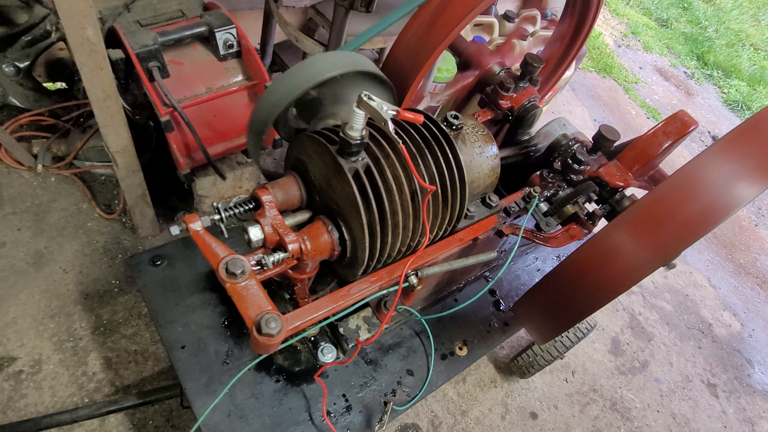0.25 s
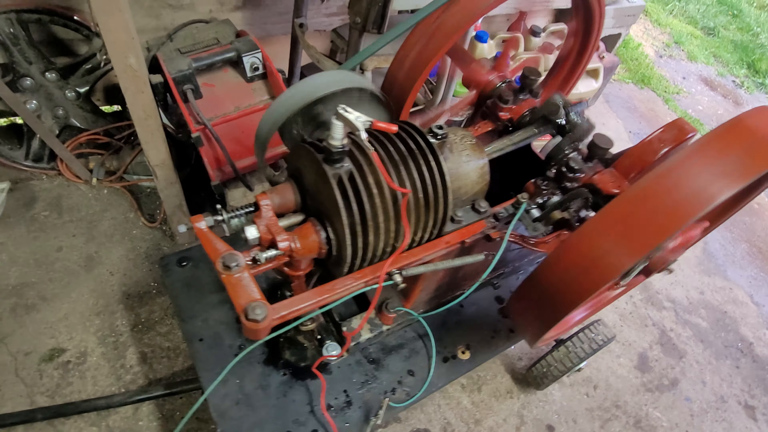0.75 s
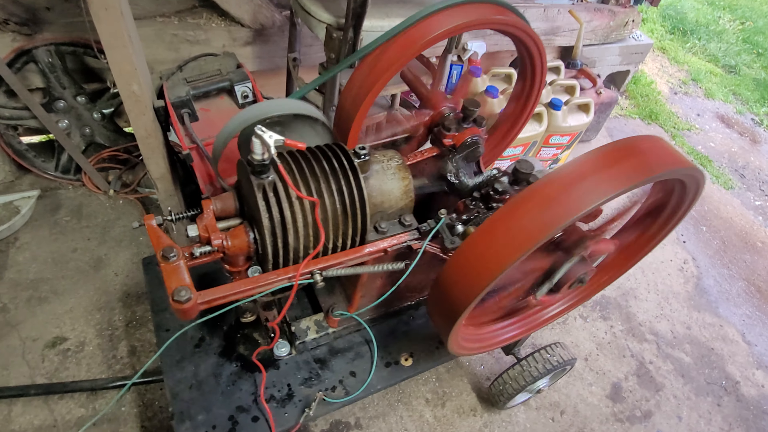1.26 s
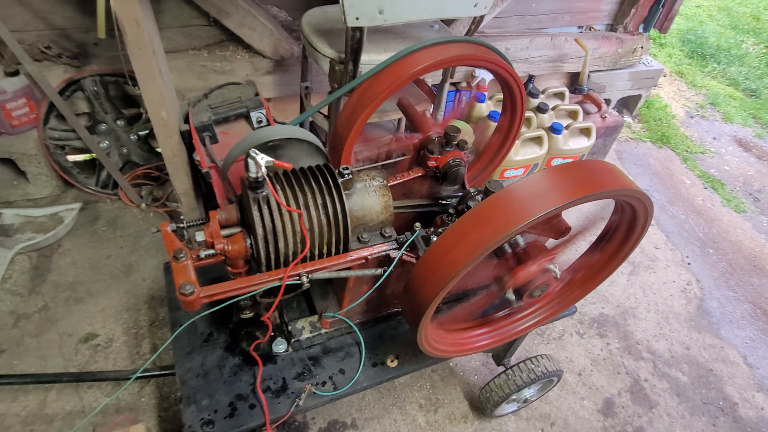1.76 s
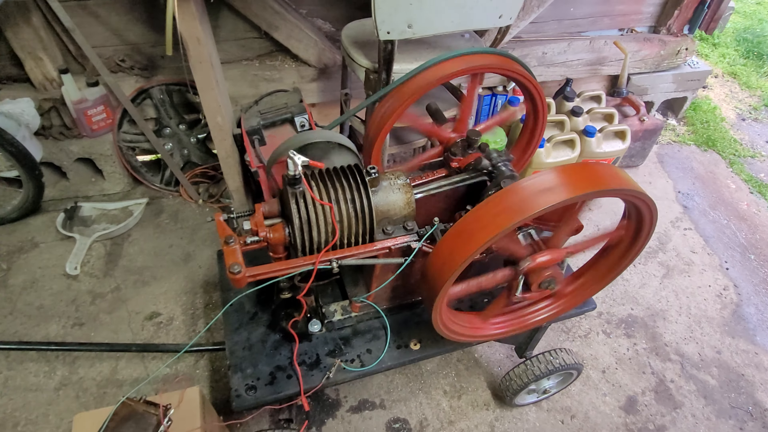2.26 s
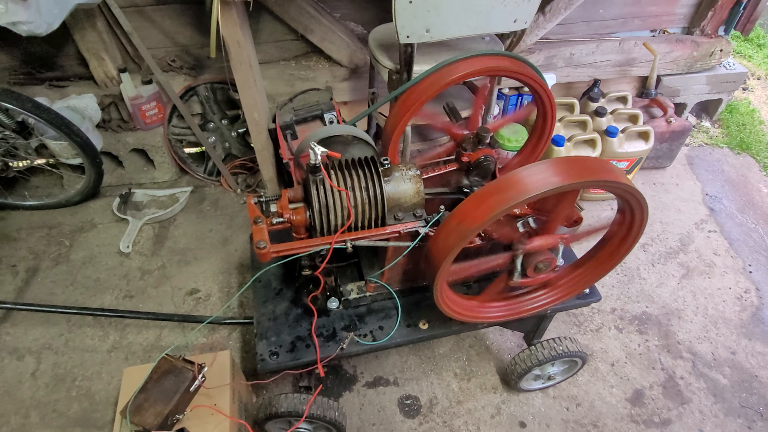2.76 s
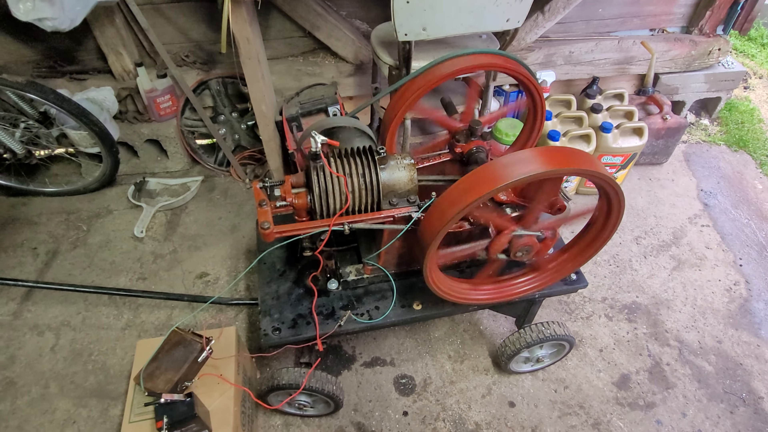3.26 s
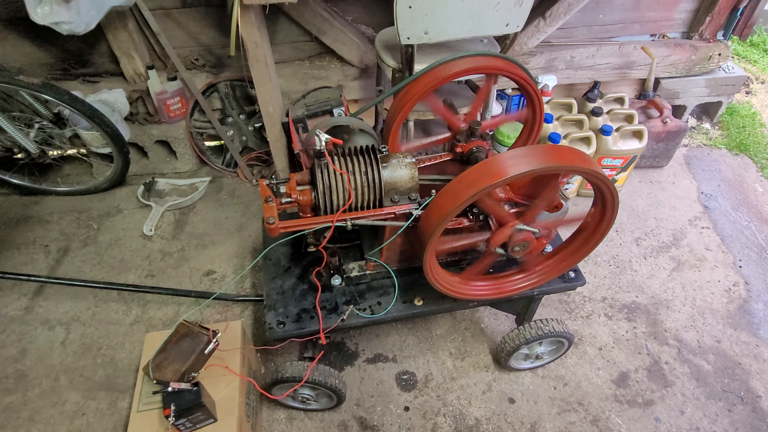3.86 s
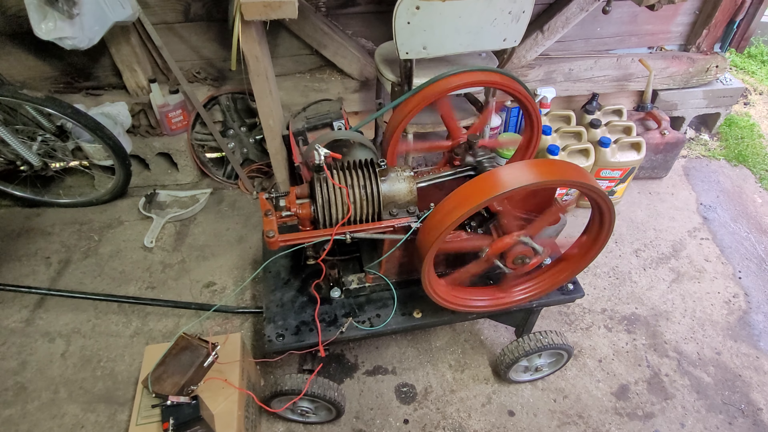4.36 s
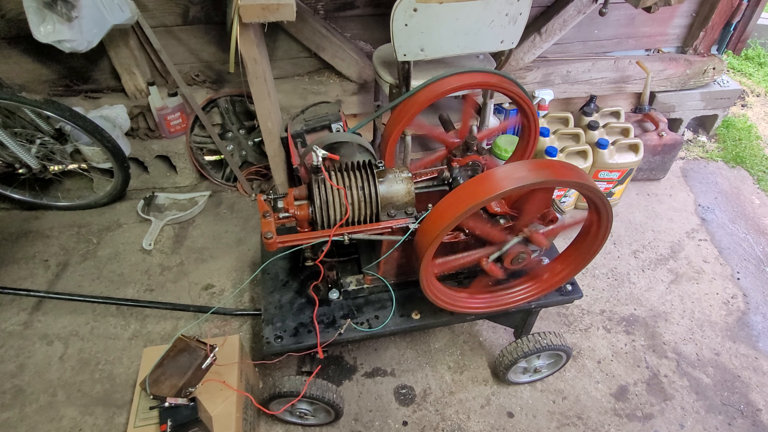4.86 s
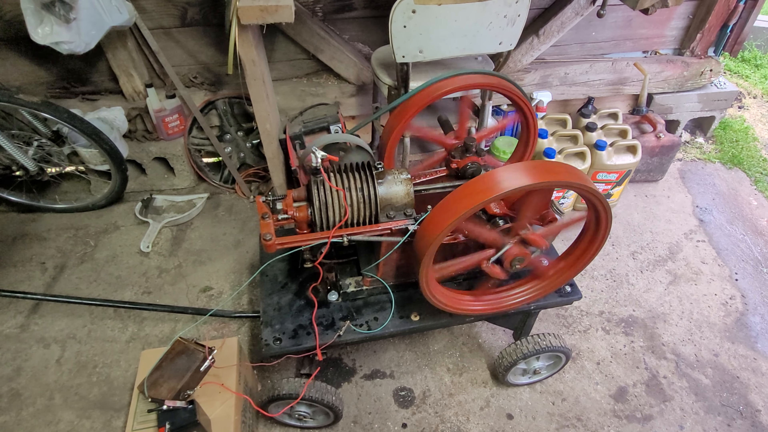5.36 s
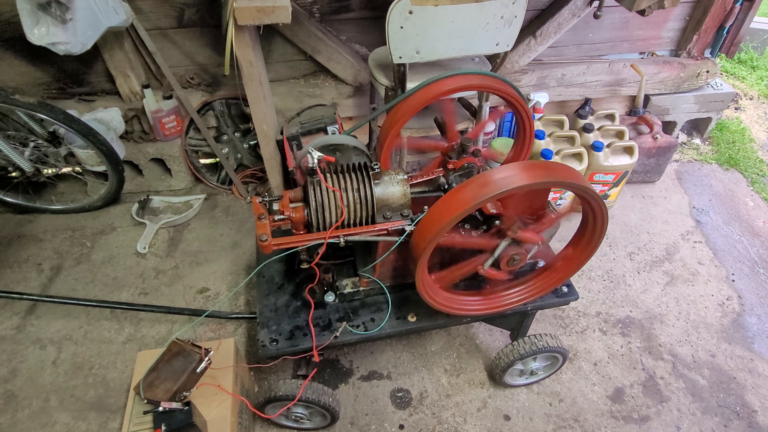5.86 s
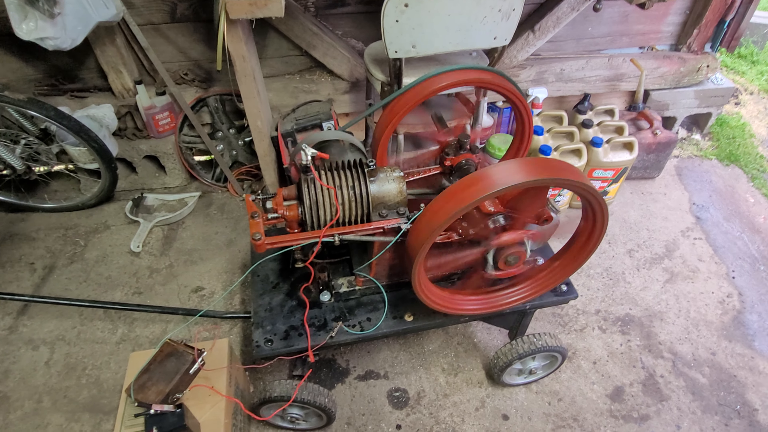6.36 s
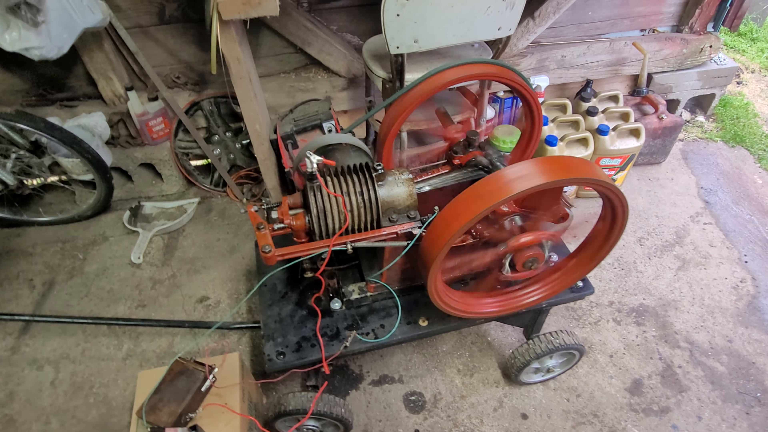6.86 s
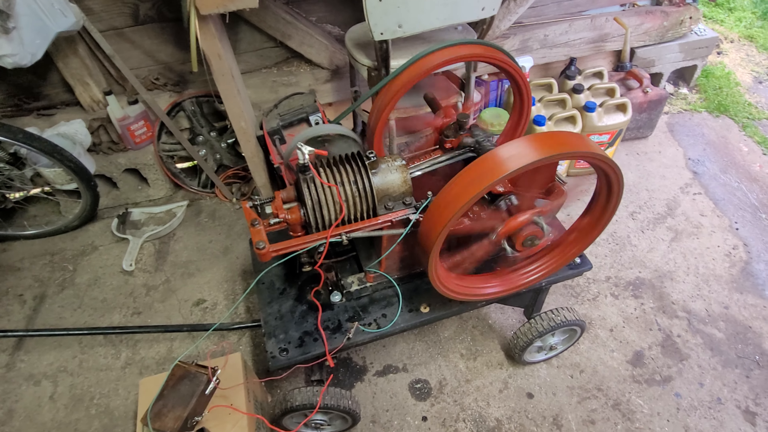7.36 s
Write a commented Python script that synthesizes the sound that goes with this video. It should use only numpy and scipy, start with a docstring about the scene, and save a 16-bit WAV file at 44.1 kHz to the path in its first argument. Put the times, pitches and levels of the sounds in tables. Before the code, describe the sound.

Old flywheel engine coasting with metallic clatter and a hollow drone, gulping air and cracking out a hard exhaust bang about every one and a half seconds.

```python
"""An open shed, where a small air-cooled hit-and-miss engine runs on its cart.
Every third or fourth turn it gulps air, sparks and fires: noise pulses played through the ring of each part.
In between it coasts: the valve gear clanks once a turn, the slack rod and gears knock, the piston pumps
air through the open valve, and the frame drones hollowly as noise and a swaying tone.
The microphone starts by the valves, where their treble is strong, and backs away."""
import sys
import numpy as np
from scipy import signal
from scipy.fft import rfft, irfft
from scipy.io import wavfile
from scipy.ndimage import uniform_filter1d

SR = 44100
rng = np.random.default_rng(int(sys.argv[2]) if len(sys.argv) > 2 else 0)


def put_to_file(sound):
    """Save the sound as 16-bit audio at rate SR, in the file named by the first command-line argument."""
    columns = np.atleast_2d(sound).T  # one column per channel
    safe = np.clip(columns, -1, 1)
    whole_steps = np.round(safe * 32767)
    wavfile.write(sys.argv[1], SR, whole_steps.astype(np.int16))


N = 335160
TIME = np.arange(N) / SR   # seconds
HZ = np.maximum(np.arange(N // 2 + 1) * SR / N, 1)

# All levels in these tables are relative: the functions add their own trims.
# Firings: the bang, the gulp of air and frame boom before it, and the igniter's snap
# (bang t/s, bang level/dB, gulp level/dB, gulp length t/s, boom level/dB, spark level/dB, spark lead t/s)
FIRINGS = [(0.102, -19.5, -22, 0.067, -25, -29.5, 0.044), (1.25, -14.5, -30, 0.068, -30, -21.5, 0.028),
           (2.763, -12, -16, .064, -15.5, -25, 0.022), (4.294, -10.5, -17.5, .063, -16.5, -20, .023),
           (5.846, -12.5, -16.5, 0.064, -11.5, -25, 0.023), (6.975, -11.5, -23, .11, -19, -20, 0.02)]
# Valve gear clank, once a turn, answered by a hollow note of the frame
# (t/s, level/dB, brightness level/dB, note level/dB, note delay t/s)
CLANKS = [(0.225, -25.5, -17, -30.5, 0.079), (0.5964, -31, -11, -39, 0.084),
          (0.9976, -30.5, -11, -44, 0.08), (1.3687, -19.5, -11.5, -29.5, 0.053),
          (1.72, -25.5, -6, -24.5, 0.088), (2.0976, -23.5, -10, -39, .04), (2.508, -20.5, -5, -20, 0.074),
          (2.8854, -20.5, -10, -23, 0.066), (3.2434, -23, -12, -18, 0.08), (3.6222, -25, -8.5, -30, 0.081),
          (4.0347, -20, -6.5, -16.5, 0.063), (4.4162, -16.5, -12, -18, 0.1),
          (4.7776, -22.5, -8.5, -15, .081), (5.1602, -22, -9.5, -24, .066), (5.5828, -17, -9, -15.5, .11),
          (5.966, -20, -10.5, -16.5, .06), (6.3348, -20.5, -13, -22, 0.07),
          (6.7281, -25.5, -7.5, -26, 0.071), (7.091, -18, -8, -23.5, 0.049), (7.4435, -23, -6, -18, 0.073)]
# Thin ticks of the valve rocker (t/s, level/dB)
TICKS = [(0.235, -34.5), (0.265, -27.5), (0.441, -32), (0.602, -31), (0.633, -34), (0.831, -38),
         (0.9985, -34.5), (1.032, -33.5), (1.408, -25.5)]
# The slack rod rattles about halfway through every coasting turn
# (t/s, level/dB, length t/s, frame boom level/dB)
RATTLES = [(0.432, -31.5, 0.061, -41), (0.819, -32, 0.064, -37.5), (1.561, -25, 0.064, -26),
           (1.9354, -23, 0.055, -27.5), (2.329, -26, 0.074, -24.5), (3.077, -25, 0.063, -25),
           (3.453, -24.5, 0.063, -29), (3.855, -27, 0.076, -25.5), (4.6125, -23.5, .058, -20.5),
           (4.9923, -22, 0.06, -26), (5.3948, -23, 0.07, -21.5), (6.1707, -25, .064, -20),
           (6.5545, -24.5, 0.068, -28), (7.278, -23.5, 0.061, -22)]
# The three knocks of a rattle
# (share of its length, level/dB, brightness level/dB, extra level at full jolt/dB)
RATTLE_KNOCKS = [(0, -11, -1.5, 22.5), (0.364, 0, -18, 0.5), (1, -9, 3, 3)]
# The governor latch knocks ahead of a firing (t/s, level/dB, brightness level/dB)
LATCH = [(2.6193, -26.5, -2), (3.9982, -27, -8), (4.147, -25, -3), (5.5411, -29, 1.5)]
# One turn, counted from the clank
# (share of the turn, pumped air level/dB, cart thud level/dB, gear churn level/dB)
TURN = [(0, -34.5, -47, -31.5), (.09, -37, -34.5, -31.5), (.14, -41.5, -40.5, -31.5), (.2, -52, -55, -39),
        (.3, -37, -48, -44.5), (.37, -29.5, -77, -33), (.44, -31, -82, -43.5), (.52, -45.5, -49, -41.5),
        (.6, -45.5, -42.5, -29), (.67, -52, -52, -31.5), (.77, -44.5, -41.5, -28), (.87, -31, -74, -34),
        (.96, -34.5, -63, -35.5), (1, -52, -32.5, -39.5)]
# Backing away from the valves brings the crank end and frame into play
# (t/s, running gear level/dB, drone level/dB, drone f/Hz)
BACKING = [(0, -6.5, -46.5, 282), (1.05, -10, -46, 291.5), (1.5, -2.5, -34.5, 296), (2.4, -3.5, -32.5, 305),
           (3.6, -5, -32, 313), (4.4, -4, -30, 318.1), (5.7, -2.5, -30.5, 314.3), (6.7, -4.5, -32.5, 314.3),
           (7.6, -1.5, -33, 305.2)]
# Band of extra treble close to the valves (t/s, left level/dB, right level/dB, centre f/Hz)
CLOSENESS = [(0, 26, 10, 12460), (.35, 20, 0, 13100), (.75, 19.5, 3, 12650), (1.2, 14, 1, 11900),
             (1.55, 11.5, 4, 11300), (1.9, 3.5, 1, 10300), (2.4, -0.5, 3.5, 9600), (7.6, -1, 2.5, 9300)]
# Frame resonances (f/Hz, spread f/Hz, level/dB)
FRAME = [(252.5, 9.2, -13), (285, 23.3, -6.5), (334.6, 30, -6.5)]
# Ringing of the ironwork (f/Hz, level/dB, time to fall 60 dB t/s)
IRON = [(1482, -6.5, 0.23), (1703, -1, 0.23), (2020, -9.5, 0.25), (2089, 6, 0.059), (2280, 6, 0.13),
        (2485, 3.5, 0.18), (3045, 6.5, 0.061), (3280, -19, 0.48), (4200, -32, .2), (4440, -14, 0.23),
        (4800, -14, 0.12), (5160, -43, 0.13), (5250, 7, 0.11), (5470, -19, 0.16)]
# Hollow notes of every gulp
# (f/Hz, level relative to the gulp/dB, extra level close to the valves/dB, delay t/s, width t/s)
GULP_NOTES = [(190, -18, 14.5, 0.049, 0.0145), (471, -9, 8.5, 0.043, 0.011)]

# Tone colour of each part (f/Hz, relative level/dB)
EXHAUST = [(60, -8), (160, -13), (300, -4.5), (600, -2), (800, -8.5), (1250, -21), (2050, 3.5),
           (2700, -6.5), (4700, 1), (6300, -7.5), (8200, -12.5), (10500, -10), (16000, -20)]
INTAKE = [(60, -19), (170, -40), (300, 14.5), (420, 7.5), (600, 2.5), (1000, -4.5), (2100, 0.5), (2800, 1),
          (5000, 3.5), (8000, -6.5), (10500, -2.5), (16000, -8)]
CLATTER = [(150, -26), (500, -11), (1000, -10.5), (1550, -5), (2350, 1), (3000, -10), (4300, -4),
           (5300, -5.5), (6400, -19.5), (8300, -24), (10500, -18), (16000, -26.5)]
AIR = [(500, 0.5), (1500, -10.5), (3500, -13), (5200, -0.5), (8200, -4.5), (10000, 3.5), (12200, 0.5),
       (14000, -2.5), (16000, -3.5)]
CHURN = [(90, -29), (140, -35.5), (190, -10), (260, 7.5), (450, -1.5), (640, -0.5), (900, -8), (1300, -8),
         (2200, -9), (5000, -15.5), (8000, -22), (16000, -93)]
THUD = [(20, -26), (35, -9.5), (50, 0.5), (70, 4), (100, -7.5), (130, -10.5), (200, -17.5), (600, -64)]
SPARK = [(500, -41), (2500, 2), (4500, 2), (8000, -4.5), (11000, 5), (13000, -1), (16000, -16)]
# How alike left and right are (f/Hz, likeness from 0 to 1)
LIKENESS = [(60, 0.9), (130, 0.9), (290, 1), (640, 0.92), (1400, 0.12), (3100, 0.063)]
# Left minus right (f/Hz, level/dB)
LEAN = [(60, -2), (92, 5), (140, -4), (210, 1.5), (330, -0.5), (500, 2), (770, 1), (1170, 1.5), (1790, -1),
        (2740, 0), (4190, 11), (6410, 7.5), (9810, 5.5), (15000, -2)]

SIDES = np.array([[1], [-1]])   # left, right
CUTOFF_HZ, TREBLE_WIDTH_HZ, RIGHT_LAG_S = 15800, 2600, 0.0001
INTAKE_LEAD_TURNS = 0.27   # the intake valve is sucked open this long before the bang
JOLT_RISE_S, JOLT_FADE_S = 0.24, 0.29
JOLT_AIR_DB, JOLT_THUD_DB, JOLT_CHURN_DB = -1.5, 3.5, 3.5
DRONE_SWING_DB, DRONE_LOUDEST_TURN = 3.5, 0.12   # the drone swells once a turn
DRONE_SWING_HZ, DRONE_HIGHEST_TURN = 7.2, 0.2734   # and its pitch sways
CLANK_NOTE_HZ, CLANK_NOTE_S = 334.3, 0.011
# The clank's note also crowns a rattle's boom, most of all near a firing
BOOM_NOTE_DB, BOOM_NOTE_JOLT_DB, BOOM_NOTE_DELAY_S = -9.5, 20, 0.056
RATTLE_NOTE_HZ, RATTLE_NOTE_DELAY_S, RATTLE_NOTE_S = 446.4, 0.09, 0.015
RATTLE_NOTE_DB, RATTLE_NOTE_CLOSE_DB = -33, 7   # louder close to the valves


def from_db(db):
    """Turn decibels into a gain."""
    return 10 ** (np.asarray(db) / 20)


def rms_one(x):
    """Scale to an average strength (rms) of 1."""
    return x / np.sqrt(np.mean(x ** 2) + 1e-20)


def follow(rows, at):
    """Read each column of a curve table at the given places."""
    place, *columns = np.transpose(rows)
    return [np.interp(at, place, column) for column in columns]


def at_hz(points):
    """Read a short spectrum at every frequency."""
    hz, value = np.transpose(points)
    return np.interp(np.log(HZ), np.log(hz), value)


def stereo_noise(gain):
    """Coloured noise, alike in both ears in the bass and different in the treble; rms 1."""
    mid, side = rfft(rng.standard_normal((2, N)))
    alike = np.clip(at_hz(LIKENESS), -1, 1)
    both = np.sqrt(1 + alike) * mid + np.sqrt(1 - alike) * side * SIDES
    lean = from_db(SIDES * at_hz(LEAN) / 2)
    return rms_one(irfft(both * gain * lean, N))


def noise(spectrum):
    """Stereo noise with a spectrum in dB."""
    return stereo_noise(from_db(at_hz(spectrum)))


def steady(x, span_s):
    """Even out swells slower than the span, keeping the quick beats."""
    power = uniform_filter1d(np.mean(x ** 2, axis=0), max(int(span_s * SR), 8))
    return x / np.sqrt(np.maximum(power, 1e-9))


def burst(start, rise_s, hold_s, t60):
    """A loudness curve that opens, holds and dies away, falling 60 dB in t60 seconds."""
    out = np.zeros(N)
    live = slice(max(int(start * SR), 0), int((start + hold_s + 2 * t60) * SR))
    age = np.maximum(TIME[live] - start, 0)
    opening = 1 - np.exp(-age / rise_s)
    out[live] = opening * from_db(-60 * np.maximum(age - hold_s, 0) / t60)
    return out


def response(spectrum, early_t60, shed_db, shed_t60, iron_db):
    """What one click on a part gives: a dense early ring, the iron's notes and the shed's tail; energy 1."""
    t = TIME[:SR // 2]
    hz_short = np.fft.rfftfreq(len(t), 1 / SR)
    fade = from_db(-60 * t / early_t60) + from_db(shed_db - 60 * t / shed_t60)
    dense = rfft(noise(spectrum)[:, :len(t)] * fade)
    # keep the fine random ripple, but make the broad colour follow the spectrum
    colour = from_db(np.interp(hz_short, HZ, at_hz(spectrum))) ** 2
    wanted = uniform_filter1d(colour, size=140)
    present = uniform_filter1d(np.mean(abs(dense) ** 2, axis=0), size=140)
    dense = irfft(dense * np.sqrt(abs(wanted / present)), len(t)) * (t < t[-1] / 2)
    modes = 0
    for hz, db, t60 in IRON:
        lean = from_db(np.interp(hz, HZ, at_hz(LEAN)) * SIDES / 2)
        wave = np.sin(2 * np.pi * (hz * t + rng.random((2, 1))))
        modes = modes + lean * from_db(db - 60 * t / t60) * wave
    return rms_one(rms_one(dense) + from_db(iron_db) * rms_one(modes)) / np.sqrt(len(t))


def sound(force, ring):
    """Play a force through the ring of a part (convolution)."""
    return signal.fftconvolve(force[None], ring, axes=1)[:, :N]


def chatter(per_s, spread_db=3.5):
    """Tiny contacts or puffs of uneven size at random moments; rms 1."""
    sizes = from_db(spread_db * np.clip(rng.standard_normal(N), -2, 2)) * rng.choice([-1, 1], N)
    return rms_one((rng.random(N) < per_s / SR) * sizes)


def turn_starts():
    """The moments at which turns begin: one at each clank, and one more at either end."""
    beats = np.array(CLANKS)[:, 0]
    return np.concatenate([[2 * beats[0] - beats[1]], beats, [2 * beats[-1] - beats[-2]]])


def crank(at):
    """Turns of the crank made by the given times."""
    beats = turn_starts()
    return np.interp(at, beats, np.arange(len(beats)))


def intake_time(bang_s):
    """When the intake valve opens for a bang, counted back in crank turns."""
    beats = turn_starts()
    return np.interp(crank(bang_s) - INTAKE_LEAD_TURNS, np.arange(len(beats)), beats)


def jolt(at):
    """How hard the gear is shaken: 1 at a firing, building up before it and fading after."""
    shakes = [np.exp(-np.maximum((s - at) / JOLT_RISE_S, (at - s) / JOLT_FADE_S)) for s, *_ in FIRINGS]
    return np.max(shakes, axis=0)


def nearness(s):
    """1 with the microphone by the valves, about 0 once it has backed away."""
    left_db, _, _ = follow(CLOSENESS, s)
    return left_db / CLOSENESS[0][1]


def coasting():
    """The crank angle times the piston's hiss, the cart's thuds and the gears' churn; firings shift their levels."""
    gear_db, _, _ = follow(BACKING, TIME)
    effort_db = gear_db + np.outer([JOLT_AIR_DB, JOLT_THUD_DB, JOLT_CHURN_DB], jolt(TIME))
    air, thud, churn = from_db(np.array(follow(TURN, crank(TIME) % 1)) + effort_db)
    hiss = air * noise(AIR)
    cart = thud * steady(noise(THUD), span_s=0.037)
    gear_ring = response(CHURN, early_t60=0.084, shed_db=-26, shed_t60=0.56, iron_db=-41.0)
    gears = sound(churn * chatter(900), gear_ring)
    return hiss + cart + gears


def frame(tone_db=-1.5, level_db=-3.5, boom_delay_s=0.025):
    """The frame drones among three close resonances, swaying with the crank; rattles and gulps make it boom."""
    gain = sum(from_db(db) / (1 + ((HZ - hz) / (0.6 * spread)) ** 2) for hz, spread, db in FRAME)
    _, drone_db, drone_hz = follow(BACKING, TIME)
    turns = crank(TIME)
    pitch = drone_hz + DRONE_SWING_HZ * np.cos(2 * np.pi * (turns - DRONE_HIGHEST_TURN))
    sway = from_db(drone_db + DRONE_SWING_DB * np.cos(2 * np.pi * (turns - DRONE_LOUDEST_TURN)))
    booms = np.zeros(N)
    for s, *_, db in RATTLES:
        booms += from_db(db) * burst(s + boom_delay_s, rise_s=0.004, hold_s=0.07, t60=0.16)
    for s, *_, db, _, _ in FIRINGS:
        booms += from_db(db) * burst(intake_time(s), rise_s=0.017, hold_s=0.069, t60=0.19)
    tone = np.sqrt(2) * np.sin(2 * np.pi * (np.cumsum(pitch) / SR + rng.random()))
    drone = steady(stereo_noise(gain) + from_db(tone_db) * tone, span_s=0.093)
    return from_db(level_db) * np.hypot(sway, booms) * drone


def intake_and_spark(fade_t60=0.84, leak_db=-6):
    """The intake gulps until its valve seats, air squeezes on past the piston, and the spark snaps."""
    gulp, snap = np.zeros(N), np.zeros(N)
    for bang_s, _, gulp_db, length_s, _, spark_db, lead_s in FIRINGS:
        s = intake_time(bang_s)
        suck = burst(s, 0.014, length_s, 0.024) * burst(s, 0.00033, 0.0078, fade_t60)
        leak = from_db(leak_db) * burst(s + length_s, 0.018, 0.044, 0.074)
        gulp += from_db(gulp_db) * (suck + leak)
        snap += from_db(spark_db) * burst(bang_s - lead_s, 0.00041, 0.0096, 0.11)
    intake_ring = response(INTAKE, early_t60=0.012, shed_db=-32, shed_t60=0.23, iron_db=-6.5)
    spark_ring = response(SPARK, early_t60=0.011, shed_db=-18, shed_t60=0.072, iron_db=-13)
    intake = sound(gulp * chatter(4500, spread_db=2.5), intake_ring)
    return from_db(3.0) * intake + sound(snap * chatter(6000), spark_ring)


def note(s, hz, db, width_s):
    """A short hollow note: a sine that swells and fades in a bell-shaped curve."""
    out, live = np.zeros(N), abs(TIME - s) < 4 * width_s
    bell = np.exp(-((TIME[live] - s) / width_s) ** 2)
    out[live] = from_db(db) * bell * np.sin(2 * np.pi * (hz * TIME[live] + rng.random()))
    return out


def hollow_notes():
    """Gulps, clanks and rattles are each followed by short hollow notes."""
    out = np.zeros(N)
    for s, _, gulp_db, *_ in FIRINGS:
        for hz, db, close_db, delay_s, width_s in GULP_NOTES:
            out += note(intake_time(s) + delay_s, hz, gulp_db + db + close_db * nearness(s), width_s)
    for s, *_, db, delay_s in CLANKS:
        out += note(s + delay_s, CLANK_NOTE_HZ, db, CLANK_NOTE_S)
    for s, *_, boom_db in RATTLES:
        crown_db = boom_db + BOOM_NOTE_DB + BOOM_NOTE_JOLT_DB * jolt(s)
        out += note(s + BOOM_NOTE_DELAY_S, CLANK_NOTE_HZ, crown_db, CLANK_NOTE_S)
        rattle_db = RATTLE_NOTE_DB + RATTLE_NOTE_CLOSE_DB * nearness(s)
        out += note(s + RATTLE_NOTE_DELAY_S, RATTLE_NOTE_HZ, rattle_db, RATTLE_NOTE_S)
    return out


def port_thump(hz, width_s, lead_s, level_db):
    """A short pressure pulse as the exhaust valve cracks open."""
    out = np.zeros(N)
    for s, db, *_ in FIRINGS:
        bell = np.exp(-np.minimum(((TIME - s + lead_s) / width_s) ** 2, 50))
        out += from_db(db + level_db) * bell * np.sin(2 * np.pi * hz * (TIME - s))
    return out


def exhaust():
    """The hot charge cracks out of the port, and swells as the valve lifts fully."""
    blast = np.zeros(N)
    for s, db, *_ in FIRINGS:
        crack = 0.84 * burst(s, 0.00045, 0.016, 0.21)
        swell = 0.5 * burst(s + 0.0076, 0.0056, 0.0067, 0.19)
        blast += from_db(db) * (crack + swell)
    ring = response(EXHAUST, early_t60=0.037, shed_db=-15.0, shed_t60=0.22, iron_db=-13.5)
    bark = sound(blast * chatter(1900, spread_db=2.5), ring)
    return bark + port_thump(hz=544, width_s=0.0031, lead_s=0.001, level_db=-4.0)


def blows(rows, ring, level_db, bright_db, hold_s, rattle_t60, bounce_s, bounce_db, strike_db, swell_s):
    """Each blow is a hard, bright strike and a brief rattle that bounces once; the dull part swells in slower."""
    contacts, dull, bright = chatter(1100, spread_db=1.0), np.zeros(N), np.zeros(N)
    for s, db, brightness, *_ in rows:
        bounce = from_db(bounce_db) * burst(s + bounce_s, 0.002, hold_s / 2, rattle_t60)
        heavy = burst(s - swell_s / 2, swell_s, hold_s, rattle_t60)
        dull += from_db(db + level_db) * (heavy + bounce) * contacts
        force = (burst(s, 0.00033, hold_s, rattle_t60) + bounce) * contacts
        force[round(s * SR)] += from_db(strike_db)
        bright += from_db(db + level_db + brightness + bright_db) * force
    # the dull part sounds below 3300 Hz, the bright part above
    low, high = (signal.butter(3, 3300, kind, fs=SR, output="sos") for kind in ("low", "high"))
    return sound(signal.sosfilt(low, dull + 1e-18) + signal.sosfilt(high, bright + 1e-18), ring)


def rod_knocks():
    """Every rattle of the slack rod is three knocks; the first gains most near a firing."""
    return [(s + share * length, db + knock_db + jolt_db * jolt(s), brightness)
            for s, db, length, _ in RATTLES
            for share, knock_db, brightness, jolt_db in RATTLE_KNOCKS]


def ironwork():
    """Clanks, knocks and rocker ticks: sudden contacts, each kind with a ring of its own."""
    gear_ring = response(CLATTER, early_t60=0.01, shed_db=-21.5, shed_t60=0.37, iron_db=-6.5)
    rod_ring = response(CLATTER, early_t60=0.017, shed_db=-14.5, shed_t60=0.26, iron_db=-17.0)
    tick_ring = response(SPARK, early_t60=0.0038, shed_db=-43, shed_t60=0.13, iron_db=-30)
    clanks = blows(CLANKS, gear_ring, level_db=2.5, bright_db=3.0, hold_s=0.012, rattle_t60=0.09,
                   bounce_s=0.0363, bounce_db=-10.5, strike_db=20, swell_s=0.0063)
    knocks = blows(rod_knocks() + LATCH, rod_ring, level_db=1.0, bright_db=1.0, hold_s=0.0065,
                   rattle_t60=0.059, bounce_s=0.026, bounce_db=-7.5, strike_db=20, swell_s=0.0055)
    taps = sum(from_db(db - 1.5) * burst(s, 0.00038, 0.0026, 0.029) for s, db in TICKS)
    return clanks + knocks + sound(taps * chatter(6000), tick_ring)


def at_microphone(x, share):
    """Near the valves a band of treble is lifted, mostly on the left; it sinks as the microphone backs away."""
    spectrum = rfft(x)
    spectrum[1] *= np.exp(-2j * np.pi * HZ * RIGHT_LAG_S)   # delay the right ear
    left_db, right_db, centre = follow(CLOSENESS, TIME)
    out, step = irfft(spectrum, N), 1500
    # overlapping bands from 6000 to 16500 Hz, each with its own moving gain
    for hz in step * np.arange(4, 12):
        band = irfft(spectrum * np.maximum(1 - abs(HZ - hz) / step, 0), N)
        nearby = 1 + ((hz - centre) / TREBLE_WIDTH_HZ) ** 2
        lift = from_db(share * np.array([left_db, right_db]) / nearby)
        out += band * (lift - 1)
    return out


def scene():
    """The whole engine; the exhaust port points away from the microphone and gains less from being near."""
    engine = coasting() + frame() + intake_and_spark() + hollow_notes() + ironwork()
    return at_microphone(engine, share=0.96) + at_microphone(exhaust(), share=0.84)


def record(dry):
    """The lowest rumble is lost, peaks are rounded, the top is cut."""
    thin = signal.sosfilt(signal.butter(3, 36, "high", fs=SR, output="sos"), dry)
    rounded = 1.094 * np.tanh(thin / 1.102)
    return signal.sosfilt(signal.ellip(10, 0.1, 80, CUTOFF_HZ, fs=SR, output="sos"), rounded)


dry = scene()
out = record(dry)
put_to_file(out)
```